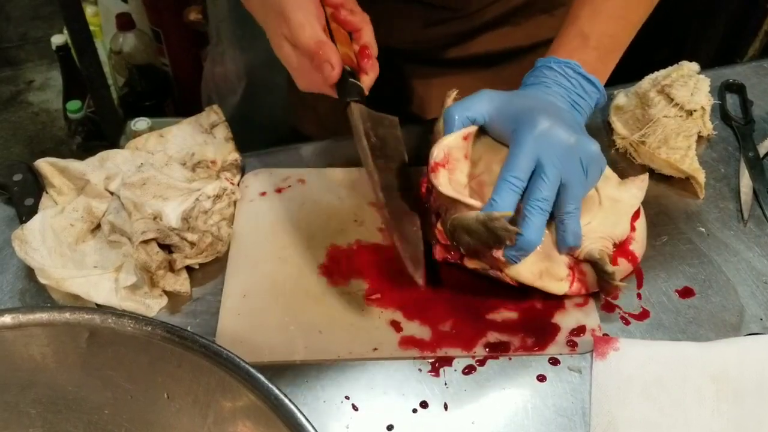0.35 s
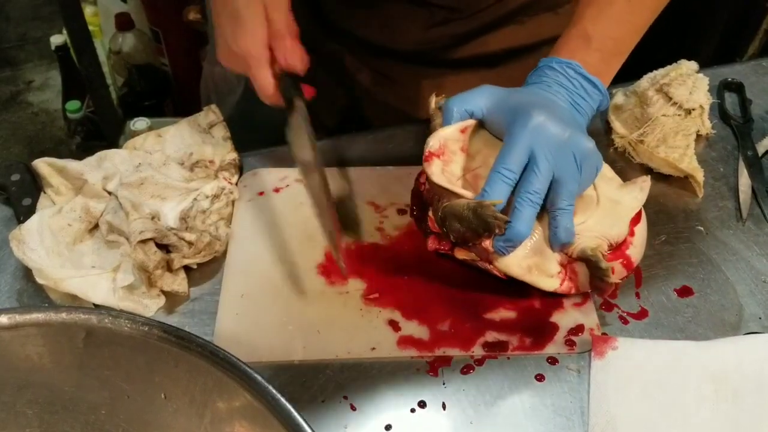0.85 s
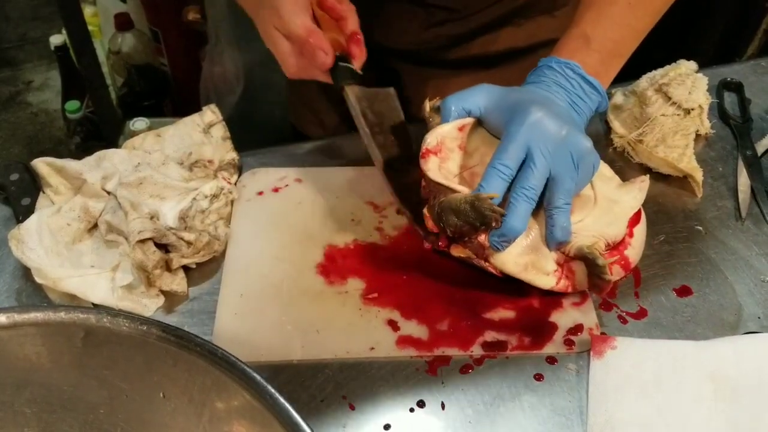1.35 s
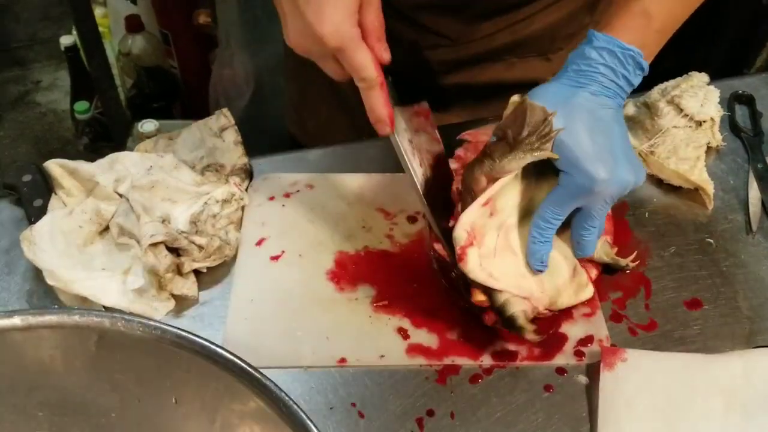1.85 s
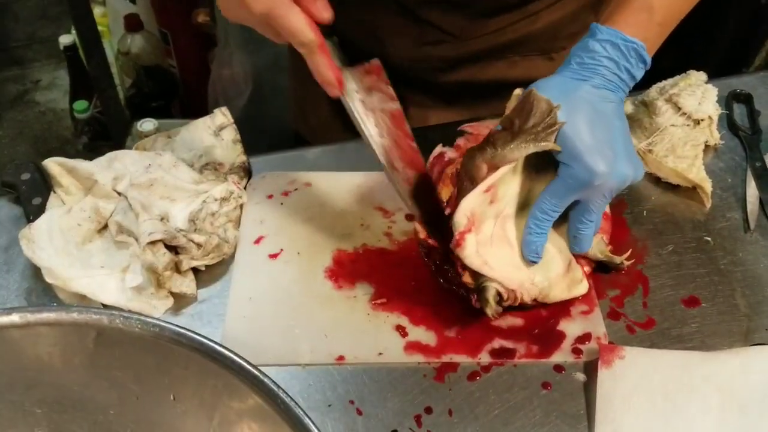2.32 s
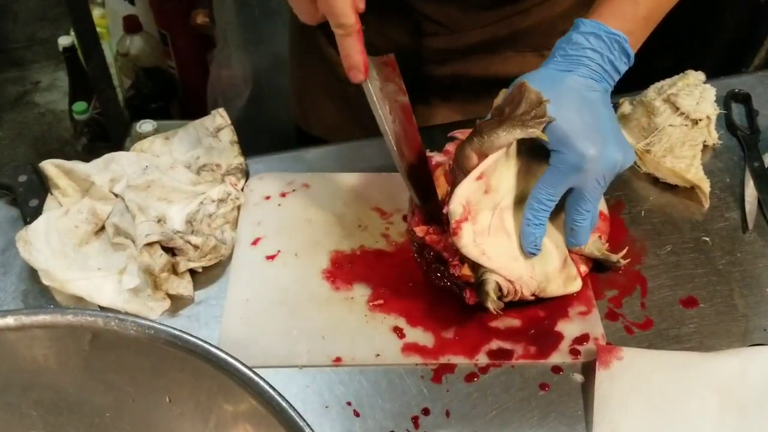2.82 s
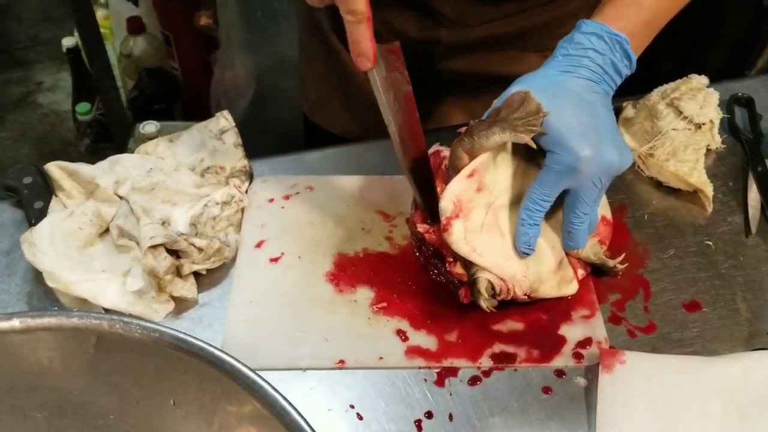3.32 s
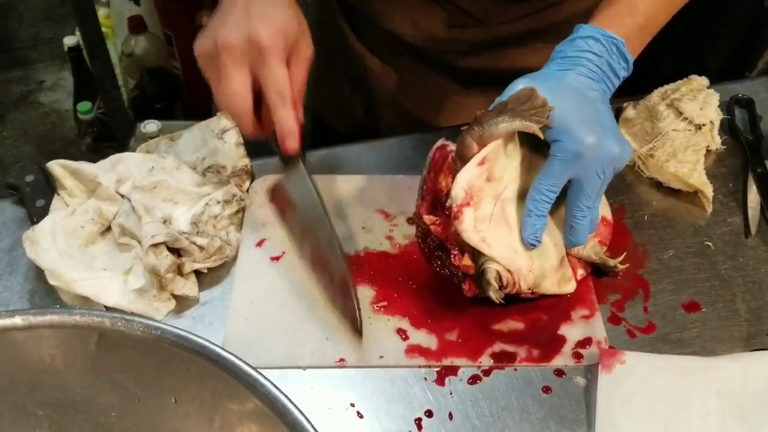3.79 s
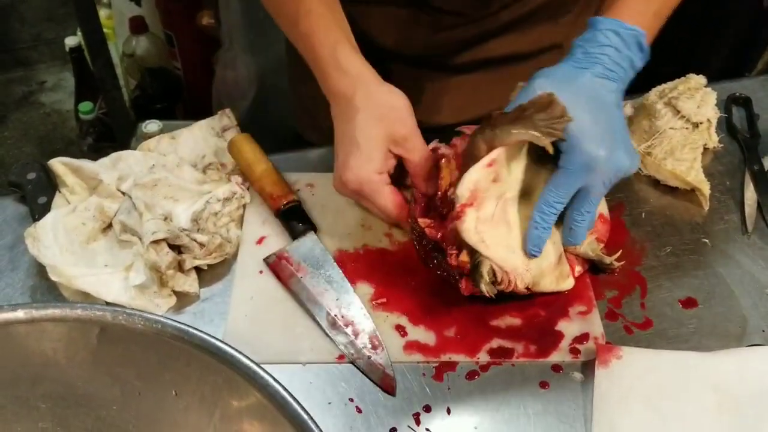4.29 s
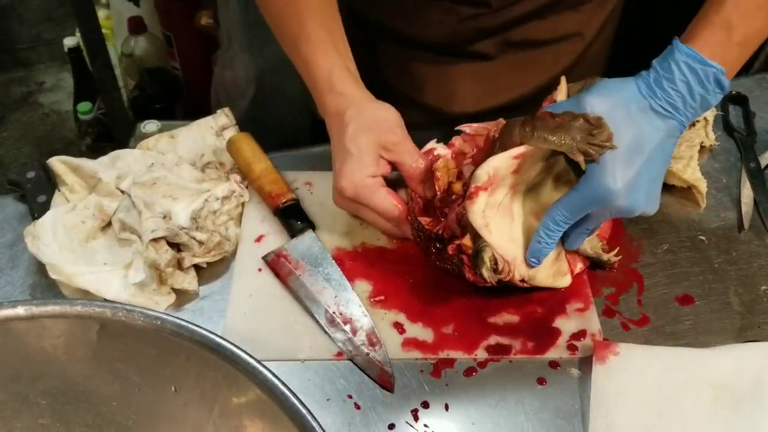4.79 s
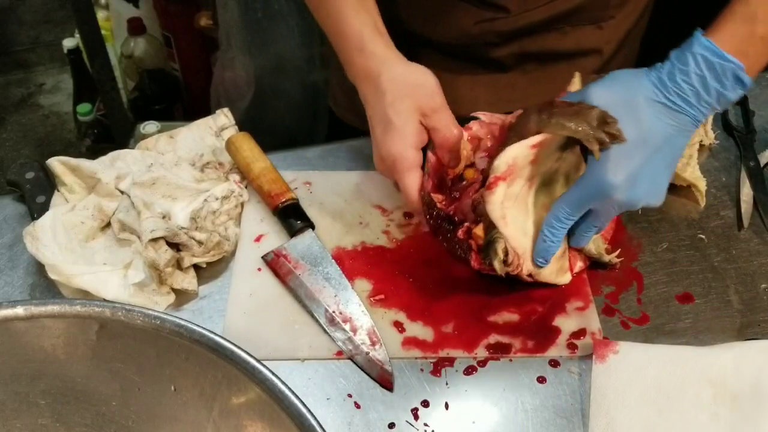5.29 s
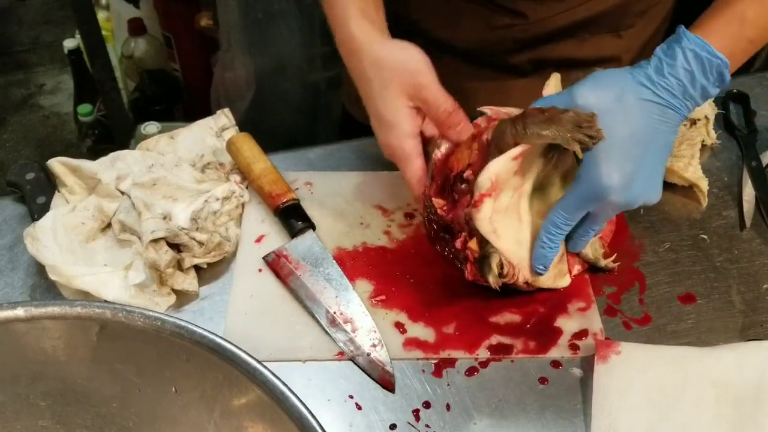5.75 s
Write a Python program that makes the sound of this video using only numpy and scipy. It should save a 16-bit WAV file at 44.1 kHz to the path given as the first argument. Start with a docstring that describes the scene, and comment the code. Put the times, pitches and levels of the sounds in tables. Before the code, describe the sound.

Low fan drone in a small kitchen, small crisp cracks, a knife dropped with a loud knock and brief rattle, then more snaps.

```python
"""A kitchen extractor fan hums and rushes throughout: wavering sine overtones, motor tones and shaped noise.
Hands slide over wet meat and snap shell on a plastic board over a steel table: swells of grain, short grit. A
knife then touches down, tips over, lands hard and rattles: grit cracks over ringing blade, board and table. The
recorder turns its gain down after the blow and stays down; under it come more snaps, the first of them ringing
clear and trailing off in a grainy swell, and more slides."""
import sys
import numpy as np
from scipy import signal
from scipy.fft import rfft, irfft, next_fast_len
from scipy.io import wavfile
from scipy.ndimage import uniform_filter1d, map_coordinates

SR = 44100
rng = np.random.default_rng(int(sys.argv[2]) if len(sys.argv) > 2 else 0)


def to_linear_factor(level_db):
    """Convert decibel levels (scalar or array-like) to linear amplitude factors."""
    exponent = np.asarray(level_db, float) / 20
    return 10 ** exponent


def digitize_waveform(pressure):
    """Quantize a signal to 16-bit integers and store it at the path in sys.argv[1].

    Rows of a 2-D input are taken as channels; values are limited to [-1, 1].
    """
    field = np.atleast_2d(pressure).T
    bounded = np.clip(field, -1, 1)
    quanta = np.round(bounded * 32767).astype(np.int16)
    wavfile.write(sys.argv[1], SR, quanta)


N = 270375
T = np.arange(N) / SR


def unit(x):
    """Scaled to rms 1."""
    return x / np.sqrt(np.mean(x ** 2) + 1e-20)


def along(points, hz):
    """(Hz, value) points read on a log frequency axis."""
    f, v = np.transpose(points)
    return np.interp(np.log(hz + 1), np.log(f + 1), v)


def curves(rows):
    """One value per sample for each column after the time."""
    s, *columns = np.transpose(rows)
    return [np.interp(T, s, column) for column in columns]


def wobble(rate):
    """A smooth random curve with rate knots a second, 40 at most."""
    knots = rng.standard_normal(int(N / SR * 40) + 4)
    return map_coordinates(knots, [T * min(rate, 40)])


def filtered(x, response):
    """x times a complex response of frequency."""
    n = x.shape[-1]
    size = next_fast_len(n + 8192)
    spectrum = rfft(x, size) * response(np.fft.rfftfreq(size, 1 / SR))
    return irfft(spectrum, size)[..., :n]


def panned(x, points):
    """Tilts a stereo sound left or right by (Hz, left-right dB) points."""
    return filtered(x, lambda hz: to_linear_factor(np.outer([.5, -.5], along(points, hz))))


def paired(pair):
    """Two unrelated signals mixed into a left and right that are alike in the bass."""
    # likeness of noise at the two microphones: pitch_hz, likeness (0-1)
    likeness = [(40, 0.94), (90, 1), (170, 0.92), (290, 1), (640, 0.39), (1400, 0.1), (3000, 0.03),
                (15000, 0)]

    def mid_side(hz):
        angle = np.arccos(np.clip(along(likeness, hz), 0, 1)) / 2
        return np.array([np.cos(angle), np.sin(angle)])

    mid, side = filtered(pair, mid_side)
    return np.array([mid + side, mid - side])


def tone(phase, db, pan_db, lead):
    """A sine of rms db, split into left and right by pan_db in level and lead (rad) in phase."""
    side = np.array([[.5], [-.5]])
    start = rng.uniform(0, 2 * np.pi)
    return np.sqrt(2) * to_linear_factor(db + side * pan_db) * np.sin(phase + side * lead + start)


def air(spectrum, patchy_db, lag_s):
    """Stereo noise of rms 1 with patches of random gain; it reaches the right side first."""
    z = signal.stft(rng.standard_normal((2, N + 512)), nperseg=512)[2]
    patches = rng.standard_normal(z.shape[1:])
    patches = uniform_filter1d(patches, size=6, axis=0)  # across frequency
    patches = uniform_filter1d(patches, size=10, axis=1)  # across time
    pair = signal.istft(z * to_linear_factor(patchy_db * unit(patches)), nperseg=512)[1][:, :N]

    def shape(hz):
        lag = np.exp(-1j * np.pi * lag_s * np.outer([1, -1], hz))
        return to_linear_factor(along(spectrum, hz)) * lag

    return unit(filtered(paired(pair), shape))


def ring(modes, t, attack):
    """Struck modes that die away; their strengths vary from blow to blow, high ones are out of step in stereo."""
    early = np.array([[.0001], [0]])  # s, left ahead of right
    total = 0
    for hz, db, t60 in modes:
        decay = to_linear_factor(db + rng.normal(0, 1.2) - 60 * t / t60)
        total = total + decay * np.sin(2 * np.pi * hz * (t + early))
    return to_linear_factor([[.4], [-.4]]) * total * (1 - np.exp(-t / attack))


def burst(t, length, colour):
    """Coloured grit, partly shared by the two sides, peak near 1, down 20 dB after length (s)."""
    grit = rng.standard_normal((3, len(t)))
    grit = unit(filtered(grit[:2] + 0.5 * grit[2], colour))
    return 0.41 * grit * to_linear_factor(-20 * t / length) * (1 - np.exp(-t / 0.00021))


def add(track, s, sound):
    """Mixes a stereo sound in at time s."""
    track[:, round(s * SR):][:, :sound.shape[1]] += sound


def fan():
    """Blade overtones locked to one slightly drifting speed, motor tones, and the moving air."""
    # overtones of the blade rate: multiple, level_db (rms before wavering), left_right_db, left_lead_rad
    overtones = [(1, -44.7, 0.7, 0.1), (2, -41.4, 0.1, -0.2), (3, -45.7, 2.3, -0.0), (4, -50.4, -2.5, -0.2),
                 (5, -61.6, 16.4, -2.3), (6, -59.4, 5.5, 0.2), (8, -57.1, -2.8, -1.6),
                 (9, -61.3, -0.7, -1.6), (10, -63.1, -0.5, -2.4), (11, -55.8, 1.2, -0.2),
                 (12, -61.6, 1.4, -0.0), (13, -59.3, 4.6, -0.3), (14, -59.7, 9.0, -2.8),
                 (15, -61.1, -6.7, -1.6), (16, -59.3, -1.6, -0.5), (17, -69.2, -1.4, 1.1),
                 (18, -62.1, -0.2, 2.8), (21, -64.4, 7.4, 1.9), (24, -65.6, 4.8, 3.1),
                 (25, -64.1, 0.6, 0.8)]
    # wavering of the lowest three overtones: time_s, first_db, second_db, third_db
    hum_waver = [(0, 4.3, -2, -3.5), (1, 4, -1.5, -0.5), (1.55, 5.5, -7, 1.5), (1.9, -1, 5, 0),
                 (2.5, -1, 3.5, 2.5), (3.1, -.7, 0.5, 3.5), (4.1, 4, -4, -5.5), (4.5, -3.5, -2, 5.5),
                 (5, 4.5, 0.4, -5), (5.6, -13, 2, -1.5), (6.13, 4, 4, -0.5)]
    # motor tones: pitch_hz, level_db (rms before wavering), left_right_db, left_lead_rad, waver_db
    motor_tones = [(59.4, -46.5, 0, 0, 1.5), (119.9, -49.5, .4, 0, 1.5), (267.8, -48.5, 1.3, 1.05, .8)]
    # spectrum of the low roar: pitch_hz, density_db (relative)
    roar_spectrum = [(15, -39), (25, -7.5), (59, 4), (95, -2.5), (113, 3), (151, 0), (194, 0), (249, -2),
                     (380, -4), (461, -6.5), (522, -16), (700, -29), (910, -53)]
    # spectrum of the rush above it: pitch_hz, density_db (relative)
    rush_spectrum = [(290, -51), (500, -5.5), (569, -5.5), (770, -5), (852, -1), (1170, -6), (1430, -4.5),
                     (1630, -2), (2020, -4), (2580, -16), (3110, -18), (7070, -18.5), (8770, -28),
                     (13100, -25), (15600, -29.5)]

    blade_hz = 78.37 + .08 * wobble(.8)
    turn = 2 * np.pi * np.cumsum(blade_hz) / SR
    waver = dict(enumerate(curves(hum_waver), start=1))
    out = np.zeros((2, N))
    for multiple, db, pan_db, lead in overtones:
        k = round(multiple)
        drift_db = waver[k] if k in waver else 1.5 * wobble(1.23)
        flutter_db = .7 * wobble(4.08)
        out += tone(k * turn, db + drift_db + flutter_db, pan_db, lead)
    for hz, db, pan_db, lead, waver_db in motor_tones:
        out += tone(2 * np.pi * hz * T, db + waver_db * wobble(2.98), pan_db, lead)
    roar = to_linear_factor(-38.5 + 0.46 * wobble(3.0)) * air(roar_spectrum, patchy_db=-1.17, lag_s=0.00011)
    rush = to_linear_factor(-41 + 0.8 * wobble(2.49)) * air(rush_spectrum, patchy_db=0.95, lag_s=.0002)
    return out + roar + rush


def slides():
    """Glove and meat sliding: faint grainy noise that swells and falls away; the swell at 4.52 s is instead the
    grainy tail of the shell snap just before it."""
    # one row a slide: loudest_s, level_db, rise_s, fall_s, treble_db
    strokes = [(1.578, -50, .025, .05, 15), (4.52, -50, .012, .03, -3), (4.7, -55, 0.079, .05, 4),
               (5.05, -64, .12, .1, 0)]
    out = np.zeros((2, N))
    for s, db, rise, fall, treble_db in strokes:

        def colour(hz):
            body_db = along([(1500, -12), (4000, 4), (9000, -3), (14000, -19)], hz)
            return to_linear_factor(body_db + along([(7000, 0), (12500, treble_db)], hz))

        grains = rng.standard_normal((2, N)) * to_linear_factor(3 * wobble(40))
        swell = np.exp(-((T - s) / np.where(T < s, rise, fall)) ** 2)
        out += to_linear_factor(db) * swell * unit(filtered(grains, colour))
    return out


def snaps():
    """Shell snaps: grit through two broad resonances, with clear modes ringing at their own level."""
    # one row a snap: start_s, level_db (near peak), length_s, body_hz, body_width_hz, top_db, clear_ring_db
    shell_snaps = [(1.595, -35, .004, 4000, 4000, -14, -60), (1.618, -35, .004, 4000, 4000, -14, -60),
                   (1.8183, -26.5, .009, 4600, 3000, -40, -60), (4.5015, -15.5, .006, 3800, 5500, -7, -25),
                   (4.686, -39, .008, 5200, 2500, -3, -60), (4.804, -35, .0056, 5200, 2500, -8, -60),
                   (5.5348, -19, .003, 5400, 2200, -13, -60), (5.7583, -30, .005, 5100, 1500, -30, -60)]
    # clear modes of the shell: pitch_hz, level_db, t60_s
    shell_modes = [(1950, -1, .025), (4960, -1, .028), (5150, -4, .02), (9150, -8, .025), (10720, -3, .014),
                   (13300, -4, .012)]
    out, t = np.zeros((2, N)), np.arange(SR // 10) / SR

    def resonance(hz, width, f):
        return np.abs(width * f / (hz * hz - f * f + 1j * f * width)) ** 2

    for s, db, length, body_hz, width, top_db, clear_db in shell_snaps:

        def colour(f):
            body = resonance(body_hz, width, f) / (1 + (f / 8000) ** 6)  # steep fall above 8 kHz
            return body + to_linear_factor(top_db) * resonance(12500, 5000, f)

        grit = to_linear_factor(db) * burst(t, length, colour)
        add(out, s, grit + to_linear_factor(clear_db) * ring(shell_modes, t, 0.00014))
    return out


def blade_crack(db, length, heavy_db):
    """The edge cracks as grit and rings the blade; a heavier knock gives more low end and less top."""
    # colour of the crack: pitch_hz, level_db
    crack_colour = [(300, -20), (650, -1), (950, 17), (1350, 5), (2100, 8), (3200, 0), (7000, -0.5),
                    (8800, -16.5), (12000, -13), (16000, -17)]
    # blade modes: pitch_hz, level_db, t60_s
    blade_modes = [(3400, -4, .015), (4430, 0, .025), (4800, -2, .02), (5700, -4, .015), (6600, -2, .02),
                   (7700, -8, .015)]
    t = np.arange(SR // 4) / SR

    def colour(hz):
        # dB of tilt per dB of heaviness
        tilt = along([(1300, .9), (2000, 0), (6000, 0.0056), (12000, -.45)], hz)
        return to_linear_factor(along(crack_colour, hz) + heavy_db * tilt)

    return to_linear_factor(db) * (burst(t, length, colour) + to_linear_factor(-20) * ring(blade_modes, t, .0004))


def weight_blow(thud_db, knock_db, hard_db):
    """The knife's weight knocks the board and shakes the table; hard contact wakes upper board modes."""
    # steel table modes: pitch_hz, level_db, t60_s
    table_modes = [(76, -11, .15), (107, 0, 0.105), (143, -1, 0.095)]
    # plastic board modes: pitch_hz, level_db (before hardness), t60_s
    board_modes = [(232, -1, 0.08), (290, -6, 0.08), (385, -3, 0.065), (428, 1, 0.035), (530, -14, .04),
                   (796, -8, 0.045), (900, 2, 0.026), (990, 0, .022), (1206, -12, 0.03), (1520, -12, 0.03),
                   (1720, -12, 0.035), (1960, -10, 0.03), (2200, -14, 0.025)]
    t = np.arange(SR // 4) / SR
    board = [(hz, db + along([(450, 0), (750, hard_db)], hz), t60) for hz, db, t60 in board_modes]
    thud = to_linear_factor(thud_db) * ring(table_modes, t, 0.0029)
    return thud + to_linear_factor(knock_db) * ring(board, t, 0.0041)


def knife():
    """Each contact cracks at the edge, then again with the weight behind it; last come rocks and rattles."""
    # contacts: start_s, crack_db, table_thud_db, board_knock_db, hardness_db,
    # weight_delay_s (after the edge), second_crack_db (over the first)
    contacts = [(3.9145, -18.5, -17, -29, 2, .0055, -8), (4.0038, -21, -32, -29, 8.5, .0045, -2),
                (4.0367, -31, -40, -45, 6, .002, 5), (4.0592, -5, -7.5, -4.5, 0, .0028, -1)]
    # rocking after the landing: start_s, crack_db, table_thud_db, board_knock_db
    rocks = [(4.0695, -19, -40, -17), (4.081, -22, -26, -19), (4.096, -25, -30, -24),
             (4.107, -28, -40, -27), (4.124, -32, -24, -34)]
    out = np.zeros((2, N))
    for s, crack_db, thud_db, knock_db, hard_db, delay, second_db in contacts:
        heavy_db = knock_db - crack_db
        add(out, s, blade_crack(crack_db, 0.0071, heavy_db))
        add(out, s + delay, blade_crack(crack_db + second_db, 0.0071, heavy_db))
        add(out, s + delay, weight_blow(thud_db, knock_db, hard_db))
    for s, crack_db, thud_db, knock_db in rocks:
        add(out, s, blade_crack(crack_db, 0.012, heavy_db=-7.5))  # little low end
        add(out, s, weight_blow(thud_db, knock_db, hard_db=0))
    return out


def kitchen(x):
    """The room's answer: a noise tail in which each frequency dies at its own speed."""
    # decay of the room: pitch_hz, t60_s
    room_decay = [(200, 0.27), (2000, 0.16), (6000, 0.19), (14000, 0.18)]
    noise = paired(rng.standard_normal((2, SR // 2)))
    hz, t, z = signal.stft(noise, SR, nperseg=256)
    decay = to_linear_factor(-60 * t / along(room_decay, hz)[:, None])
    tail = signal.istft(z * decay, SR, nperseg=256)[1]
    tail = filtered(tail, lambda f: to_linear_factor(along([(150, -16.5), (700, -15.0)], f)))  # slightly less bass
    late = np.pad(x, ((0, 0), (250, 0)))  # samples before the first answer
    return signal.fftconvolve(late, tail / np.linalg.norm(tail[0]), axes=1)[:, :N]


def scene():
    """Fan all round; hands and knife close by, a little to the right, with the room answering."""
    # where the board lies between the two microphones: pitch_hz, left_right_db
    board_side = [(150, -0.5), (400, -1.5), (1000, -1), (2200, -0.5), (4500, -3.5), (9000, -2.5)]
    near = slides() + snaps() + knife()
    near = near + to_linear_factor(-8.5) * kitchen(near)
    return fan() + panned(near, board_side)


def gain_control(x):
    """A loud moment pulls the gain down, smoothed over 0.11 s, and it creeps back very slowly."""
    recover_db = .05 * T  # 0.05 dB a second
    power = np.abs(uniform_filter1d(np.mean(x ** 2, axis=0), size=882))  # 20 ms window
    level_db = 10 * np.log10(power + 1e-12)
    wanted_db = np.clip(0.48 * (level_db + 23), 0, 3.4)
    cut_db = np.maximum(np.maximum.accumulate(wanted_db + recover_db) - recover_db, 0)
    keep = np.exp(-1 / (0.11 * SR))
    return x * to_linear_factor(-signal.lfilter([1 - keep], [1, -keep], cut_db))


def top_cut(x):
    """Nothing passes above the cut-off."""
    return signal.sosfilt(signal.butter(12, 16800, fs=SR, output="sos"), x)


def record(dry):
    """Two unequal microphone ports with a bass cut, then gain control; the treble is also cut near 15.8 kHz."""
    # microphone pair: pitch_hz, left_right_db
    port_balance = [(60, 0), (120, 0.5), (240, 1.5), (480, 0.5), (950, 2), (1890, 4.5), (3770, -0.5),
                    (7520, -1), (15000, -7.5)]
    ports = filtered(dry, lambda hz: (1j * hz / (35 + 1j * hz)) ** 2)  # bass cut
    ports = panned(ports, port_balance)
    treble_cut = filtered(ports, lambda hz: hz < 15780)
    mix = gain_control(treble_cut)
    return top_cut(mix)


dry = scene()
out = record(dry)
digitize_waveform(out)
```